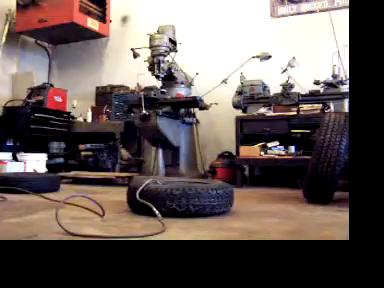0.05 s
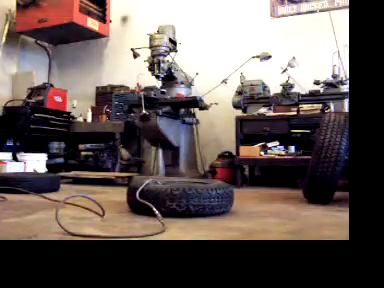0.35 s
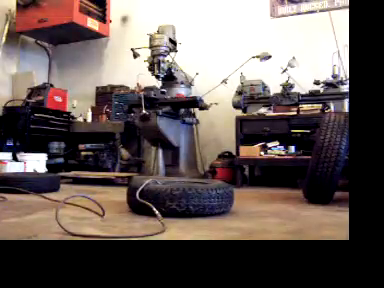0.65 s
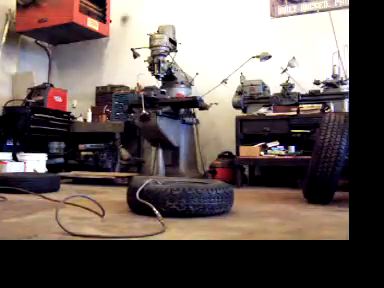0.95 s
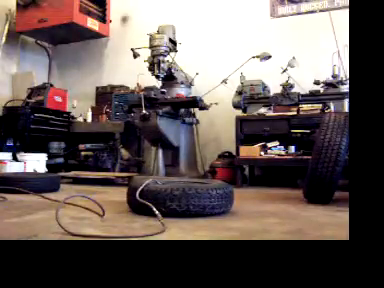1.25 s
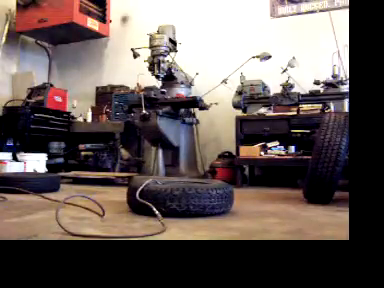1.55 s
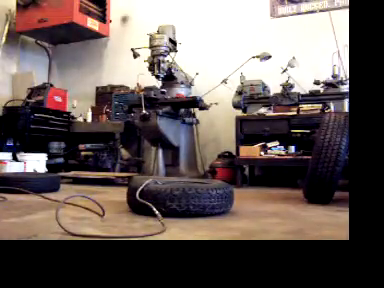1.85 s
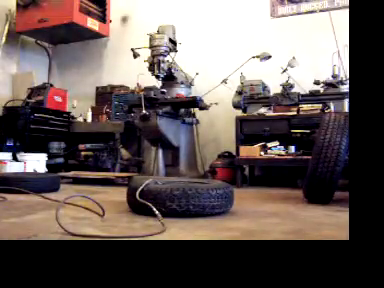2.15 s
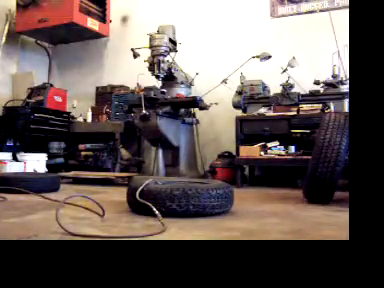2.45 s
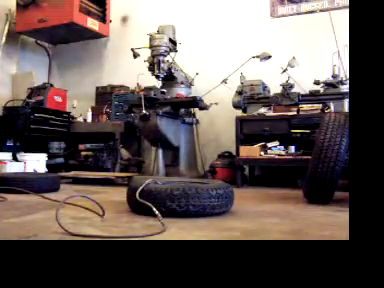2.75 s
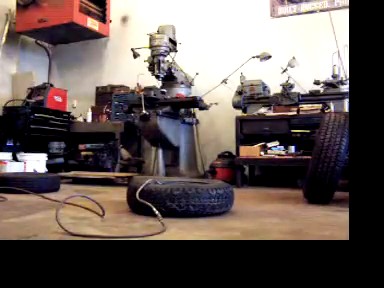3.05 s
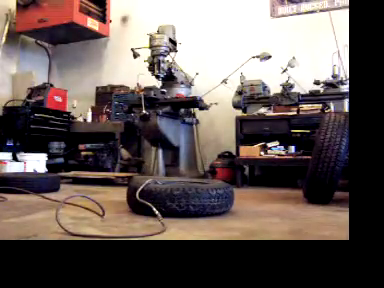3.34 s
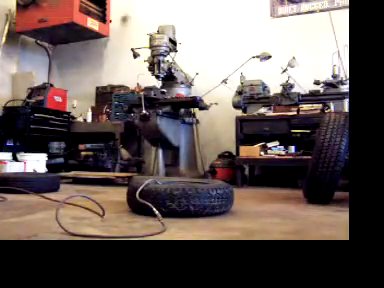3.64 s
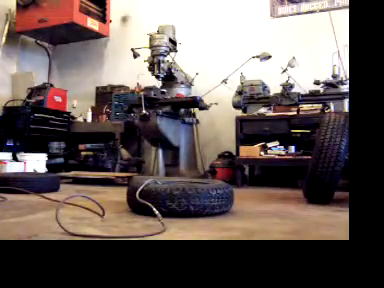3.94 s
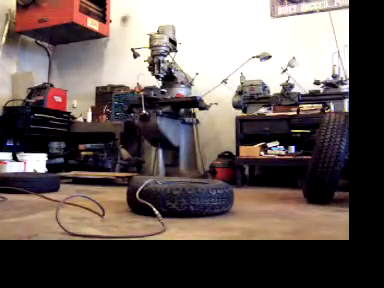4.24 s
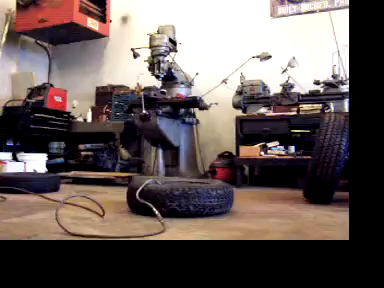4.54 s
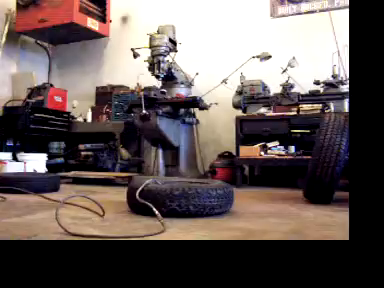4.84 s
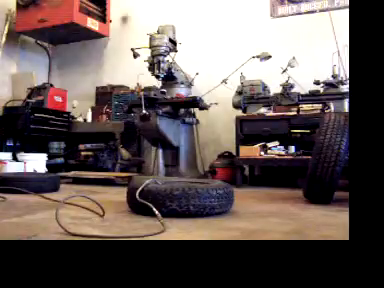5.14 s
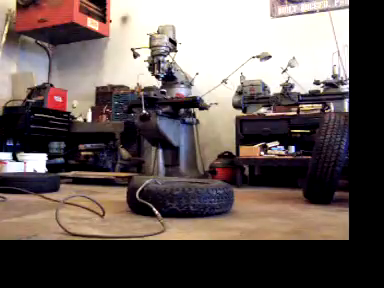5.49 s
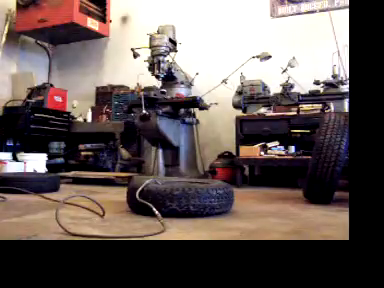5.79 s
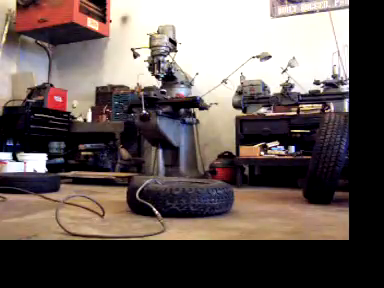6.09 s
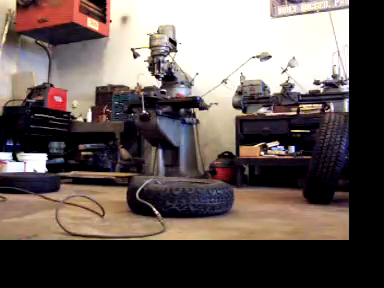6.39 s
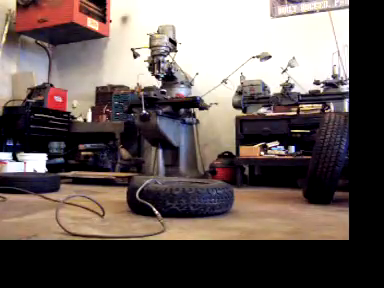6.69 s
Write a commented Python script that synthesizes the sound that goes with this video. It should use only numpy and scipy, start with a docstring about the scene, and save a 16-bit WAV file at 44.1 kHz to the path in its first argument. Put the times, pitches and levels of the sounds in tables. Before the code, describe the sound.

Compressed air hisses through an air chuck into a tire on a workshop floor, heard from close by. The hiss begins with a breathy whistle that fades as the sound grows brighter, with a faint ringing from the tire, rim and hose. Underneath, a dull rush of air inside the tire swells and ebbs. Two soft thumps come in the second half while the hiss carries on, with short room echoes around it.

```python
"""A workshop, one microphone close to a tire on the floor: compressed air hisses in through an air chuck.
The hiss starts with a breathy whistle and brightens as the tire fills; tire, rim and hose ring faintly
in it, and the room adds early echoes. Two soft thumps sound over the low rush of air inside the tire.
The recorder samples at a low rate, so the top of the hiss folds over."""
import sys
import numpy as np
from scipy import signal
from scipy.fft import rfft, irfft
from scipy.io import wavfile

SR = 44100
rng = np.random.default_rng(int(sys.argv[2]) if len(sys.argv) > 2 else 0)


def digitize_waveform(pressure):
    """Quantize a signal to 16-bit integers and store it at the path in sys.argv[1].

    Rows of a 2-D input are taken as channels; values are limited to [-1, 1].
    """
    field = np.atleast_2d(pressure).T
    bounded = np.clip(field, -1, 1)
    quanta = np.round(bounded * 32767).astype(np.int16)
    wavfile.write(sys.argv[1], SR, quanta)


N = 296352
TIME, FREQS = np.arange(N) / SR, np.fft.rfftfreq(N, 1 / SR)


def hiss(base_db=-30, split_hz=5700, split_width_hz=500, coarse_db=0.99, fine_db=4.0):
    """The jet at the valve, close up: the fine eddies of its top gain on the coarse as the tire fills."""
    # turbulence at the valve: (frequency [Hz], relative spectral level [dB])
    jet_spectrum = [(1200, -30), (1900, -18.5), (2700, -14.5), (3300, -9.5), (3900, -6), (4500, -2.5),
                    (5050, -1.5), (5950, 0), (6480, -2.5), (6950, -1), (7360, 2), (7650, 0.1), (8000, -5.5)]
    colour = gain_of(read(jet_spectrum, FREQS)) * cavity()
    lift_db = brightening()
    fine_share = .5 + .5 * np.tanh((FREQS - split_hz) / split_width_hz / 2)
    coarse = noise(colour * np.sqrt(1 - fine_share)) * gain_of(coarse_db + 0.15 * lift_db)
    fine = noise(colour * np.sqrt(fine_share))
    fine *= gain_of(fine_db + lift_db + 0.05 * flutter(rate_hz=30))
    level_db = base_db + 0.14 * swell() + 0.46 * flutter(rate_hz=9.3)  # nearly steady
    return (coarse + fine) * gain_of(level_db)


def brightening(empty_db=-8, full_db=4, fill_s=3.12):
    """Lift of the top of the hiss in dB: it climbs quickly, then levels off as the tire fills."""
    return empty_db + (full_db - empty_db) * np.tanh(TIME / fill_s)


def swell(crest_s=3.9, rise_db_per_s=1.37, ebb_db_per_s=1.62):
    """Strength of the airflow in dB against its crest: a steady rise, then a steady ebb."""
    return np.minimum(rise_db_per_s * (TIME - crest_s), ebb_db_per_s * (crest_s - TIME))


def cavity():
    """Response of tire, rim and hose: each resonance lifts a narrow strip of the passing noise."""
    # narrow resonances: (frequency [Hz], width [Hz], lift [dB])
    resonances = [(1069, 27, 4.3), (1744, 22, 4.5), (1933, 22, 7.4), (2630, 40, 3.9), (4040, 40, 4.4),
                  (4347, 35, 4.4), (4487, 40, 5.6), (4578, 22, 5.2), (4697, 40, 3.6), (5214, 19, 7.2),
                  (5308, 38, 4.1), (5378, 40, 3.6), (5580, 35, 3.8), (5736, 40, 3.2), (5905, 40, 2.9),
                  (6008, 24, 4.3), (6150, 27, 3.5), (6185, 24, 4.0), (6272, 40, 3.3), (6586, 19, 3.6),
                  (6662, 30, 4.5), (6813, 22, 4.2), (7049, 40, 3.1), (7079, 24, 5.0), (7292, 40, 3.0),
                  (7464, 40, 3.2)]
    return 1 + sum((gain_of(db) - 1) * band(hz, width) for hz, width, db in resonances)


def whistle(fade_ratio=0.97):
    """Breathy whistles at the valve, which sink away as the hiss brightens."""
    # whistling bands of noise: (centre [Hz], nominal width [Hz], level before the fade [dB])
    whistles = [(2060, 560, -57), (4800, 800, -41.5)]
    breath = sum(noise(band(hz, width) ** 2 * cavity()) * gain_of(db) for hz, width, db in whistles)
    return breath * gain_of(-fade_ratio * brightening())


def rush(crest_db=-42):
    """The dull roar of air tumbling inside the tire, rising and ebbing with the flow."""
    # turbulence in the tire: (frequency [Hz], relative spectral level [dB])
    rush_spectrum = [(12, -17), (40, -7.5), (100, -7), (250, -5.5), (530, -3.5), (850, -5), (1300, -2.2),
                     (1750, -3), (3200, -3), (5000, -24)]
    colour = gain_of(read(rush_spectrum, FREQS)) * cavity()
    return noise(colour) * gain_of(crest_db + swell())


def thumps(rise_s=.008):
    """Two dull blows with no clear ring, dying away in the room."""
    # noise bursts; the first three merge into one thump:
    # (time [s], level [dB], centre [Hz], width [Hz], time to fall 60 dB [s])
    bursts = [(4.092, -45.5, 200, 240, 0.42), (4.094, -44.5, 750, 900, 0.77), (4.13, -42, 72, 29.8, 0.3),
              (5.316, -47, 170, 170, 0.4)]
    out = np.zeros(N)
    for start, db, hz, width, t60 in bursts:
        age = np.maximum(TIME - start, 0)
        attack = 1 - np.exp(-age / rise_s)
        out += noise(band(hz, width)) * attack * gain_of(db - 60 * age / t60)
    return out


def workshop(x, echo_db=-11.0, t60_s=0.82, count=120):
    """Echoes off floor, benches and walls reach the microphone after the direct hiss and comb it finely."""
    delay_s = rng.uniform(.005, .06, count)
    taps = np.zeros(N)
    taps[(delay_s * SR).astype(int)] = rng.choice([-1, 1], count) * gain_of(-60 * delay_s / t60_s)
    echoes = rfft(taps / np.linalg.norm(taps))
    return filtered(x, 1 + gain_of(echo_db) * echoes)


def rumble(level_db=-68.5):
    """Room tone: the workshop's own faint, low rumble."""
    return gain_of(level_db) * noise(band(centre_hz=65, width_hz=61))


def gain_of(db):
    """Decibels to amplitude."""
    return 10 ** (np.asarray(db) / 20)


def read(points, hz):
    """Reads a spectrum table on a log-frequency axis."""
    f, value = np.transpose(points)
    return np.interp(np.log(hz + 1), np.log(f + 1), value)


def filtered(x, response):
    """Applies a frequency response."""
    return irfft(rfft(x) * response, N)


def noise(response):
    """Noise of rms 1 with the given colour."""
    x = filtered(rng.standard_normal(N), response)
    return x / np.sqrt(np.mean(x ** 2) + 1e-20)


def band(centre_hz, width_hz):
    """A resonance peak, width_hz wide at half its amplitude."""
    return 1 / (1 + ((FREQS - centre_hz) / width_hz * 2) ** 2)


def flutter(rate_hz):
    """Slow random wavering of rms 1."""
    return noise(band(0, 2 * rate_hz))


def scene():
    """At the microphone: the jet with its echoes, the rush in the tire, room tone and thumps."""
    air = workshop(hiss() + whistle()) + rush()
    return (air + rumble() + thumps())[None]


def record(dry, recorder_hz=16000, edge_hz=8950, fold_db=-1, fold_fall_db_per_khz=28):
    """The recorder's low sampling rate mirrors the top of the hiss about half that rate; then a low-pass."""
    above_khz = (FREQS - recorder_hz / 2) / 1000
    sampled = filtered(dry[0], above_khz < 0)
    mirror = 2 * np.cos(2 * np.pi * recorder_hz * TIME) * sampled
    mirror = filtered(mirror, (above_khz > 0) * gain_of(fold_db - fold_fall_db_per_khz * abs(above_khz)))
    low_pass = signal.firwin(401, edge_hz, window=("kaiser", 9), fs=SR)
    return signal.oaconvolve(sampled + mirror, low_pass, "same")[None]


dry = scene()
out = record(dry)
digitize_waveform(out)
```